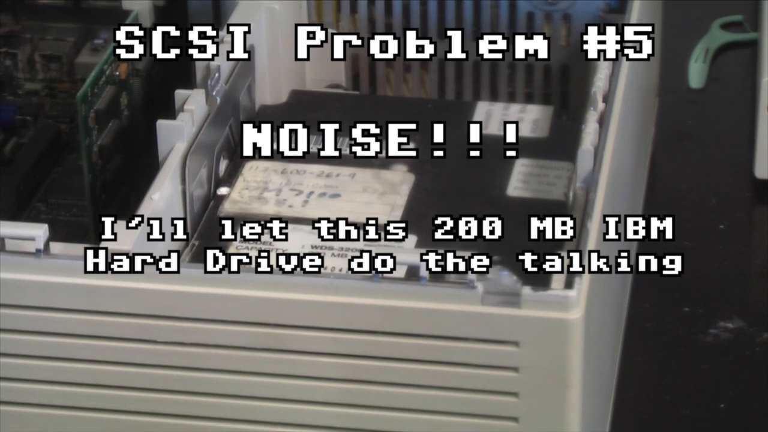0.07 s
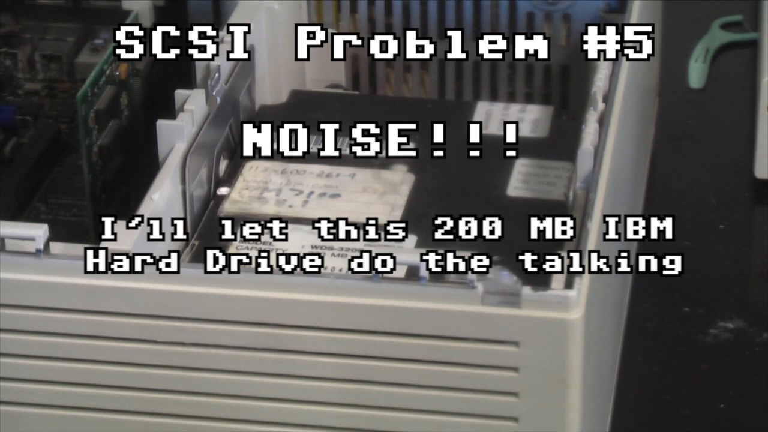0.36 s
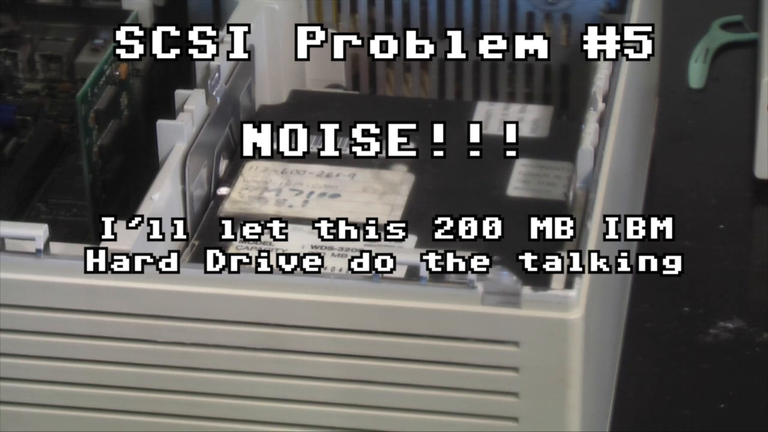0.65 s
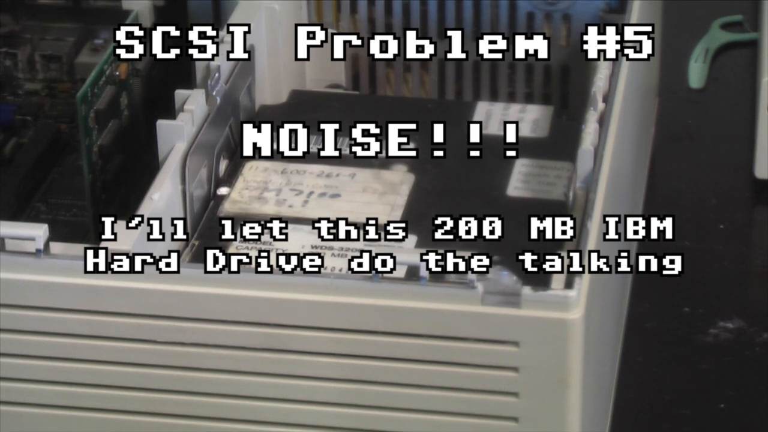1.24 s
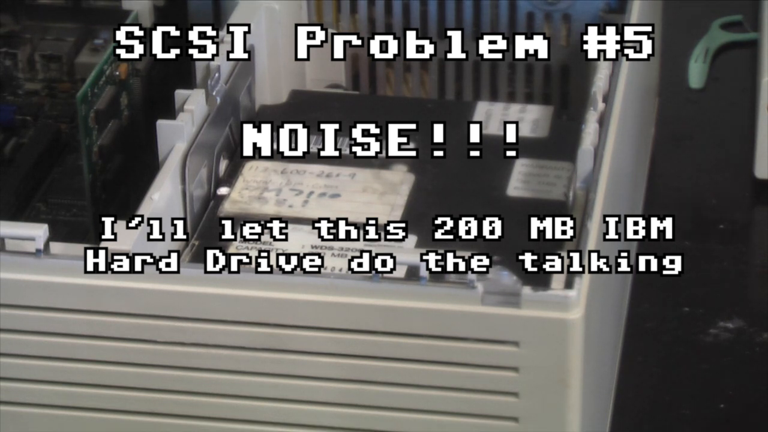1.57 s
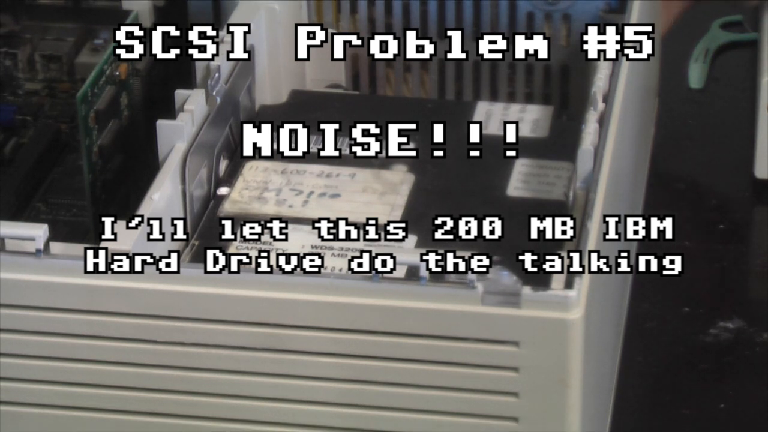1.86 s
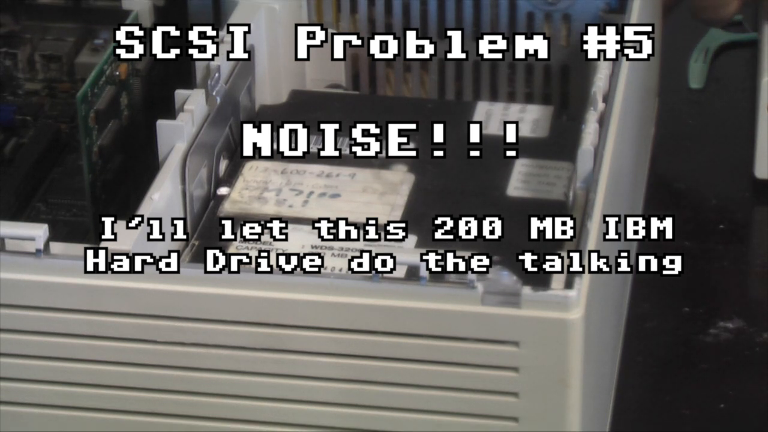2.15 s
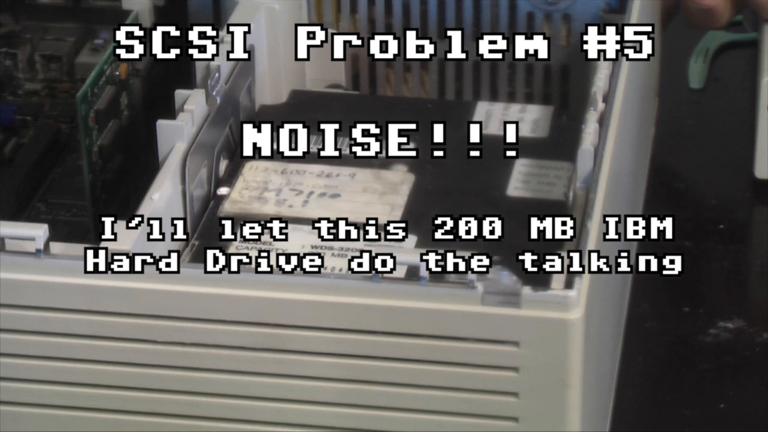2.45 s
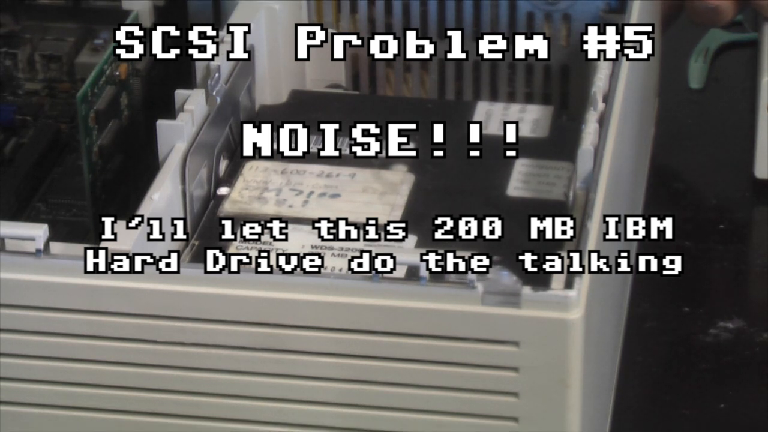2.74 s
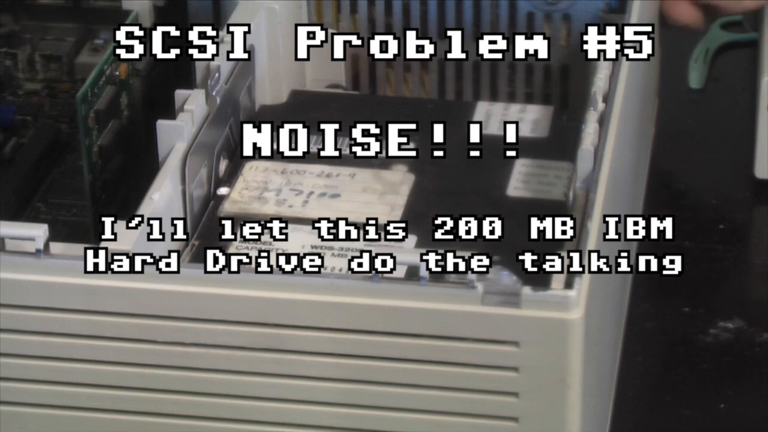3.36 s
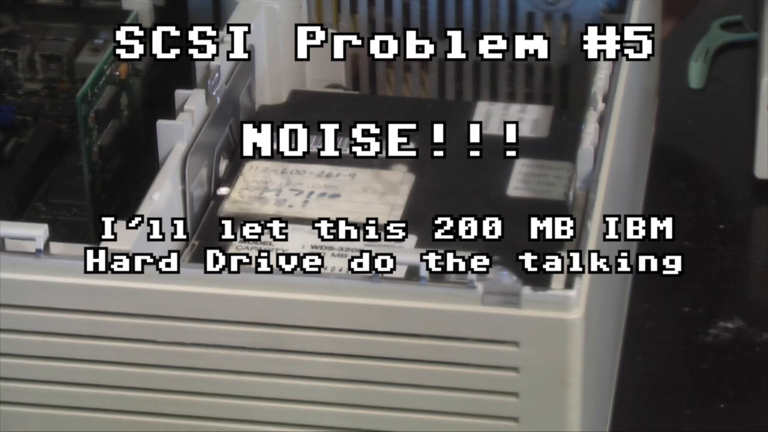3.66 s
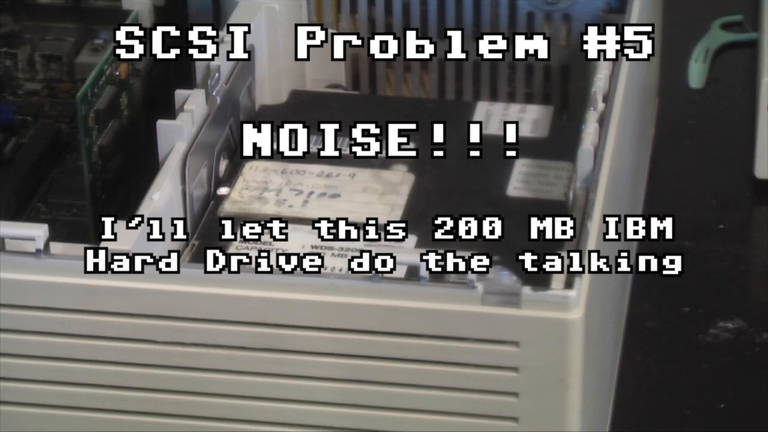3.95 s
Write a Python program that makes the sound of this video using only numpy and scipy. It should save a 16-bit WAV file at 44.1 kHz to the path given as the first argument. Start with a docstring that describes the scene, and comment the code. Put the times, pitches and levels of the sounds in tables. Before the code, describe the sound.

An old hard drive whirs close by in an open computer case, its worn bearings whining in many high tones over fan air, a low hum and a gently pulsing tone. At about 1.5 seconds a metal latch snaps once, and the whir dips slightly. From about 3.3 seconds the heads chatter in four short, rhythmic runs while everything fades out by 4 seconds.

```python
"""Old hard drive in an open case

Close by, worn bearings whine in a thicket of tones over fan air and hum, and two close tones beat.
A latch snaps once and ducks the recorder's gain. Later the heads chatter in four short runs,
knocking the resonances of case, frame and arm, while the sound fades out."""
import sys
import numpy as np
from scipy import signal
from scipy.fft import rfft, irfft
from scipy.io import wavfile
from scipy.ndimage import uniform_filter1d

SR = 44100
rng = np.random.default_rng(int(sys.argv[2]) if len(sys.argv) > 2 else 0)


def persist_wave(psi):
    """Save psi, clipped to +-1, as 16-bit WAV."""
    counts = np.round(np.clip(psi, -1, 1) * 32767).astype(np.int16)
    wavfile.write(sys.argv[1], SR, np.atleast_2d(counts).T)


N = 176400
T = np.arange(N) / SR
CUTOFF_HZ = 13850
KNOCK_RISE_S, THUD_FALL_S = 0.0017, 0.014

# Stereo width of the whir: frequency_hz, likeness (left-right correlation)
LIKENESS_CURVE = [(60, 0.5), (120, .92), (400, 1.2), (700, -0.36), (1300, 0.65), (2400, 0.45),
                  (4400, -0.79), (8000, -0.08), (14000, 0.18)]
# Stereo position of the whir: frequency_hz, pan_db (left minus right)
PAN_CURVE = [(100, 4), (380, 3.5), (700, -3), (1300, 0.5), (2400, 4), (4400, 8.5), (8000, 6.5),
             (12000, -0.5)]
# Resonances of the case, drive frame and head arm: pitch_hz, width_hz, relative_db
CASE_MODES = [(187, 10.7, -2.5), (410, 49, -0.5), (474, 81, -4), (610, 69, -10.5), (766, 29, -2)]
FRAME_MODES = [(1543, 170, -8.5), (2113, 176, 4), (2243, 170, -5), (2830, 690, -3), (3640, 630, -2),
               (4220, 840, -1.5)]
ARM_MODES = [(5870, 310, 4.5), (7070, 230, 5.5), (7840, 200, -6.5), (8060, 880, -1), (10600, 1200, -17)]


def from_db(db):
    """Decibels to gain."""
    return np.exp(np.log(10) / 20 * np.asarray(db))


def unit_rms(x):
    """Scale to rms 1."""
    return x / np.sqrt(np.mean(x ** 2) + 1e-20)


def at_hz(curve, hz):
    """Read a curve on a log-frequency axis."""
    points_hz, values = np.transpose(curve)
    return np.interp(np.log(np.maximum(hz, 1)), np.log(points_hz), values)


def automation(curve):
    """Straight ramps between points in time."""
    return np.interp(T, *np.transpose(curve))


def pan(pan_db):
    """Left and right gains of constant power; positive is left."""
    gains = from_db(np.array([[.5], [-.5]]) * pan_db)
    return gains / np.sqrt(np.mean(gains ** 2, axis=0))


def drift(corner_hz):
    """Slow random wavering of rms 1."""
    hop, settle = 100, 1000
    pole = np.exp(-2 * np.pi * corner_hz * hop / SR)
    noise = rng.standard_normal(N // hop + settle + 2)
    slow = signal.lfilter([1], [1, -2 * pole, pole ** 2], noise)[settle:]
    return np.interp(np.arange(N) / hop, np.arange(len(slow)), unit_rms(slow - slow.mean()))


def stereo_noise(likeness, spectrum=False):
    """White noise, or its spectrum, with the given left-right correlation."""
    noise = rng.standard_normal((2, N))
    mid, side = rfft(noise) if spectrum else noise
    likeness = np.clip(likeness, -1, 1)
    return np.sqrt((1 + likeness) / 2) * mid + np.sqrt((1 - likeness) / 2) * side * [[1], [-1]]


def tone(cycles, level_db):
    """A sine with the given rms level."""
    return np.sqrt(2) * from_db(level_db) * np.sin(2 * np.pi * cycles)


def burst(peak_s, rise_s, fall_s):
    """An envelope that swells to 1 and dies away."""
    return np.exp(-np.minimum(np.maximum((peak_s - T) / rise_s, (T - peak_s) / fall_s), 40))


def resonate(force, modes):
    """Ring parallel resonances of alternating polarity; white noise roughly keeps its power."""
    out, power = 0, 0
    for k, (hz, width_hz, db) in enumerate(modes):
        radius, gain = np.exp(-np.pi * width_hz / SR), from_db(db)
        scale = (1 - radius ** 2) / 2
        poles = [1, -2 * radius * np.cos(2 * np.pi * hz / SR), radius ** 2]
        out += (-1) ** k * gain * signal.lfilter([scale, 0, -scale], poles, force + 1e-18)
        power += gain ** 2 * scale
    return out / np.sqrt(power)


def rotor_tone(cycles, level_db, pan_db, likeness):
    """One tone of a spinning part, flickering in level by itself."""
    start = rng.random() + np.array([[0], [np.arccos(np.clip(likeness, -1, 1))]]) / (2 * np.pi)
    flicker_db = 2.05 * drift(corner_hz=2.8)
    return pan(pan_db) * tone(cycles + start, level_db + flicker_db)


def fan_air():
    """A steady rush of air from fan and platters, coloured by the case."""
    # Colour of the rush: frequency_hz, relative_db
    colour = [(30, -95.5), (60, -90), (100, -83), (180, -70), (290, -69.5), (400, -73.5), (450, -71),
              (550, -78), (700, -68.5), (950, -76), (1400, -77.5), (1800, -81), (2250, -69), (2600, -76),
              (3400, -68), (4000, -69.5), (4600, -67.5), (5200, -74), (6200, -78), (7400, -71),
              (9000, -74.5), (11300, -84), (13400, -81)]
    hz = np.arange(N // 2 + 1) * SR / N
    noise = stereo_noise(at_hz(LIKENESS_CURVE, hz), spectrum=True)
    rush = irfft(noise * pan(at_hz(PAN_CURVE, hz)) * from_db(at_hz(colour, hz)), N)
    return from_db(1.5) * np.sqrt(SR / 2) * rush


def bearing_thicket(spin_s):
    """Harmonics of cage, spindle and ball passes; the cage puts sidebands on the ball passes."""
    # Typical level of these many weak tones: pitch_hz, level_db
    contour = [(200, -73.5), (700, -61.5), (1500, -68.5), (2200, -62), (3500, -56.5), (4800, -53),
               (5500, -66), (7500, -57), (13500, -68)]
    cage_hz, spindle_hz, ball_pass_hz = 43.59, 71.95, 309.55
    cage, spindle, balls = (np.arange(2, CUTOFF_HZ // f) * f for f in (cage_hz, spindle_hz, ball_pass_hz))
    sidebands = balls[:, None] + cage_hz * np.arange(-3, 4)
    hz = np.concatenate([cage, spindle, sidebands.ravel()])
    level_scatter, pan_scatter, phase_scatter = rng.standard_normal((len(hz), 3)).T
    level_db = at_hz(contour, hz) + 4.5 * np.minimum(level_scatter, 2)
    gain = from_db(level_db) * pan(at_hz(PAN_CURVE, hz) + 4 * pan_scatter)
    right_shift = np.arccos(np.clip(at_hz(LIKENESS_CURVE, hz), -1, 1)) + 0.52 * phase_scatter
    phase = 2 * np.pi * rng.random(len(hz)) + np.array([[0], [1]]) * right_shift
    spectrum = np.zeros((2, N + 1), complex)
    spectrum[:, np.round(hz * N / SR).astype(int)] = gain * np.exp(1j * phase)
    loop = irfft(spectrum) * N * np.sqrt(2)  # twice oversampled, read at the wandering speed
    position = spin_s * 2 * SR % (2 * N)
    return np.array([np.interp(position, np.arange(2 * N), channel) for channel in loop])


def motor_hum(spin_s):
    """Motors and fan blades drone over a steady mains hum."""
    # Motor and blade tones: pitch_hz, level_db, pan_db, likeness
    partials = [(240.0, -56.0, 3.0, 1.0), (260.8, -56.0, 2.0, 1.0), (359.8, -58.0, 2.0, 1.0),
                (520.5, -56.5, 3.0, 0.9), (575.7, -57, -10.0, -0.5), (619.7, -53.0, -11.0, -0.8),
                (697.3, -53.0, -4.0, -0.8), (743.4, -46.0, -8.0, -0.7), (1189.8, -55.0, 3.0, -0.2)]
    mains = tone(120.6 * T, level_db=-59)
    return mains + sum(rotor_tone(hz * spin_s, *voicing) for hz, *voicing in partials)


def bearing_whine(spin_s):
    """Worn bearings sing and slowly shift colour: some tones swell while others sink."""
    # Strongest bearing tones: pitch_hz, relative_db, pan_db, likeness, swell_db
    whine_tones = [(2091.7, -47, 0, .8, -4), (2745.6, -47, -11, .3, 1), (2830, -47, 3, -.6, 0),
                   (3138.7, -45, 5, .4, 2), (3405.2, -42, 8, -1, 6), (3486.3, -41, 13, -.9, 0),
                   (3530.5, -46, 4, -.8, 0), (3715.4, -41.5, 11, -1, 4), (3758, -46, 12, -.8, 3),
                   (4024.7, -45, 9, -.8, -6), (4067.4, -47, 8, -.9, 0), (4183.4, -48, 16, -.2, 0),
                   (4376.7, -36.5, 4, -.9, -1), (4489.4, -45, 8, -.8, 0), (4532.1, -44, 5, -.3, 0),
                   (4576.6, -39.5, 6, -.5, 2), (4599.2, -40, 1, -.8, 0), (4620, -44, 5, -.4, 0),
                   (4995.9, -44.5, 22, -.3, 5.5), (5218.1, -52, 14, .6, 8), (7162.5, -52, 4, -1, 9),
                   (7757, -48, 6, 0, 0), (9153, -47, 7, .9, 2), (12026, -57, 0, .5, 0)]
    peak_s, width_s = 1.62, 1.01
    swell = np.exp(-((T - peak_s) / width_s) ** 2)
    return from_db(0.53) * sum(rotor_tone(hz * spin_s, db + swell_db * swell, pan_db, likeness)
                               for hz, db, pan_db, likeness, swell_db in whine_tones)


def whistle(spin_s):
    """A high whistle on the left starts strong, sinks and partly returns."""
    # Whistle envelope: time_s, level_db
    whistle_levels = [(0, -34), (.6, -33.5), (1.6, -53), (4, -46)]
    return tone(4686.3 * spin_s, automation(whistle_levels)) * pan(18)


def fan_tone(spin_s):
    """A centred fan tone sinks and swells."""
    # Fan tone envelope: time_s, level_db
    fan_levels = [(0, -41.5), (.4, -42.5), (.8, -53.5), (1.48, -44.5), (1.9, -51.5), (2.1, -44), (4, -47)]
    return tone(663.2 * spin_s, automation(fan_levels))


def beating_pair(spin_s):
    """Two close tones swell and nearly cancel about twice a second."""
    # Pitch gap between the two: time_s, beat_hz
    beat_rates = [(0, 2.15), (1.7, 2.15), (2.2, 2.42), (4, 2.31)]
    # Envelope of the stronger tone: time_s, level_db
    beat_levels = [(0, -44), (1.25, -42.5), (2.2, -45), (3.1, -48)]
    pitch_hz, first_dip_s = 1548, .11
    beats = np.cumsum(automation(beat_rates)) / SR
    beats -= np.interp(first_dip_s, T, beats)
    cycles, level_db = pitch_hz * spin_s, automation(beat_levels)
    return (tone(cycles, level_db) - tone(cycles + beats, level_db - 1.5)) * pan(-1)


def latch():
    """A metal latch lets go, scrapes along and hits its stop; both impacts ring and shake the case."""
    # Release and stop: start_s, relative_db, pitch_hz, t60_s
    impacts = [(1.5316, -9, 2930, .045), (1.537, -2.5, 2030, .035)]
    ring_rise_s, twin_ratio = 0.00076, 1.04
    rings, force, shake = 0, 0, 0
    for start_s, db, hz, t60_s in impacts:
        age = np.maximum(T - start_s, 0)
        phase = 2 * np.pi * hz * age
        pair = np.sin(phase) + from_db(-12) * np.sin(twin_ratio * phase)
        attack = 1 - np.exp(-age / ring_rise_s)
        rings += from_db(db - 60 * np.minimum(age / t60_s, 2)) * attack * pair
        shake += from_db(db) * burst(start_s, KNOCK_RISE_S, THUD_FALL_S)
        force += from_db(db) * burst(start_s, rise_s=0.0002, fall_s=0.003)
    crack = from_db(-7) * resonate(force * stereo_noise(likeness=0.79), FRAME_MODES)
    thud = from_db(-23.5) * resonate(shake * stereo_noise(likeness=0.31), CASE_MODES)
    slide = from_db(-15.5) * burst(1.536, rise_s=0.0058, fall_s=0.00042) * stereo_noise(likeness=0.052)
    scrape = resonate(slide, ARM_MODES) + from_db(2) * resonate(slide, FRAME_MODES)
    return (rings + crack + scrape) * pan(5) + thud


def case_echo(knocks, t60_s=0.07):
    """A short diffuse ring inside the open case."""
    age = T[:SR // 2]
    tail = rng.standard_normal((2, len(age))) * from_db(-60 * age / t60_s)
    return signal.fftconvolve(knocks, unit_rms(tail) / np.sqrt(len(age)), axes=1)[:, :N]


def head_seeks():
    """Each jerk of the heads thuds in the case, clacks in the frame and rasps in the arm."""
    # Head movements: peak_s, clack_db, clack_centre_hz, rasp_db
    jerks = [(3.3182, -12, 3940, -23), (3.3309, -8.5, 2330, -18), (3.358, -19, 3000, -17.5),
             (3.369, -22, 3600, -25), (3.377, -20, 1600, -20.5), (3.499, -16.5, 2920, -22.5),
             (3.512, -19, 2500, -21), (3.544, -24, 2500, -19), (3.562, -19, 2600, -17),
             (3.6, -33, 2500, -25), (3.714, -18, 2740, -20), (3.7271, -10.5, 2970, -20),
             (3.753, -18.5, 2300, -20), (3.776, -21.5, 1700, -18), (3.901, -15.5, 3470, -24),
             (3.916, -20, 2600, -22), (3.943, -24, 2500, -24)]
    focus_db_per_octave = 16  # gives each clack its own colour
    contact = stereo_noise(likeness=0.73)
    shake, clack, rub = 0, 0, 0
    for peak_s, clack_db, centre_hz, rasp_db in jerks:
        modes = [(hz, width_hz, db - focus_db_per_octave * abs(np.log2(hz / centre_hz)))
                 for hz, width_hz, db in FRAME_MODES]
        force = burst(peak_s, KNOCK_RISE_S, fall_s=0.0052) * contact
        clack += from_db(clack_db) * resonate(force, modes)
        shake += from_db(-24) * burst(peak_s, KNOCK_RISE_S, THUD_FALL_S)
        rub += from_db(rasp_db) * burst(peak_s, KNOCK_RISE_S, fall_s=0.0067)
    thud = resonate(shake * stereo_noise(likeness=0.17), CASE_MODES)
    rasp = resonate(rub * stereo_noise(likeness=0.063), ARM_MODES)
    return thud + (clack + rasp) * pan(3)


def scene():
    """A bed of air and spinning parts, with latch and heads on top."""
    spin_s = T + 0.00023 * np.cumsum(drift(corner_hz=1.76)) / SR  # a clock that wanders with the rotation
    whir = fan_air() + bearing_thicket(spin_s) + motor_hum(spin_s) + bearing_whine(spin_s)
    whir += whistle(spin_s) + fan_tone(spin_s) + beating_pair(spin_s)
    knocks = latch() + head_seeks()
    return whir + knocks + from_db(-15) * case_echo(knocks)


def record(dry):
    """Gain control ducks on peaks and recovers slowly; then a fade-out and a treble cut."""
    threshold_db, max_duck_db, opening_duck_db = -7.5, 5.9, 3
    attack_s, recovery_db_per_s = 0.00033, 1.2
    fade_start_s, fade_end_s = 3.116, 4.021
    level_db = 10 * np.log10(2 * uniform_filter1d(np.max(dry ** 2, axis=0), size=88) + 1e-12)
    duck_db = np.clip(level_db - threshold_db, 0, max_duck_db)
    duck_db[0] = opening_duck_db
    held_db = np.maximum.accumulate(duck_db + recovery_db_per_s * T) - recovery_db_per_s * T
    pole = np.exp(-1 / (attack_s * SR))
    ducked = dry * from_db(-signal.lfilter([1 - pole], [1, -pole], held_db))
    fade = np.clip((fade_end_s - T) / (fade_end_s - fade_start_s), 0, 1)
    clipped = np.clip(from_db(1.5) * ducked * fade, -1, 1)
    return signal.sosfilt(signal.ellip(10, .1, 80, CUTOFF_HZ, fs=SR, output="sos"), clipped)


dry = scene()
out = record(dry)
persist_wave(out)
```